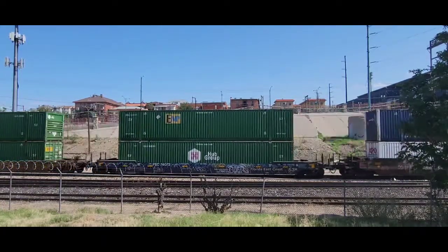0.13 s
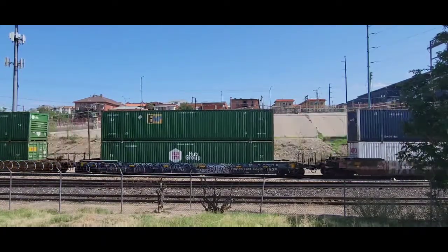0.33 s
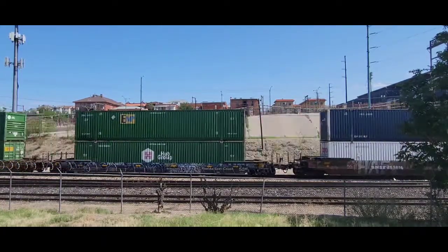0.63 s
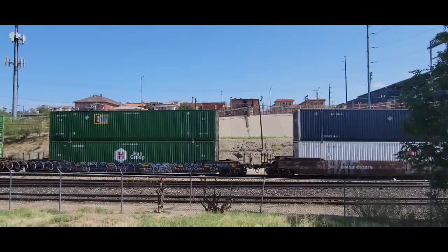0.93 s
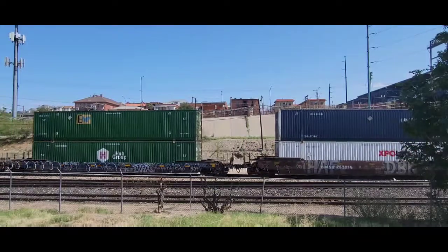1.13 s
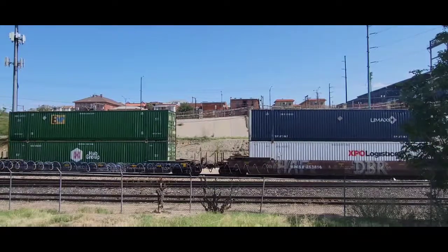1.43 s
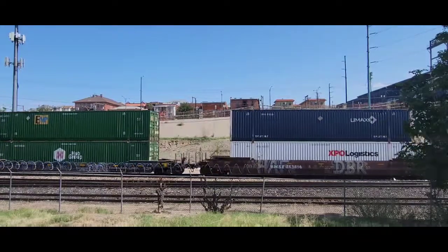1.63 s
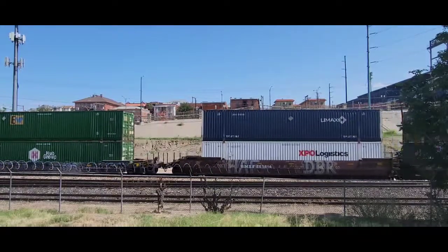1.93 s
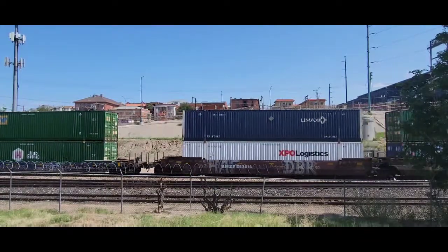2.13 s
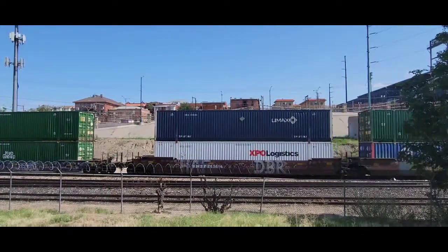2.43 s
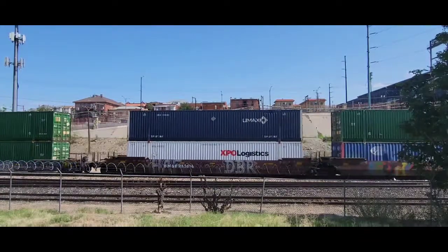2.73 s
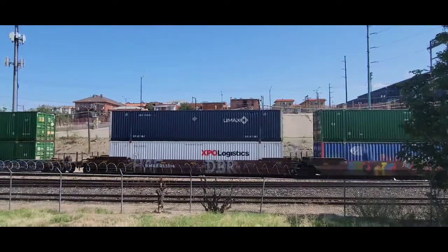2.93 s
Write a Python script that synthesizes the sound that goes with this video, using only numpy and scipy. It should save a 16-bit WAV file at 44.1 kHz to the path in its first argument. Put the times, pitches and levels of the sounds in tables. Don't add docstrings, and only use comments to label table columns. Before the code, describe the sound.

A slow freight train passes continuously outdoors, heard from trackside on a stereo phone. Rail rumble and dull, irregular hollow wagon booms run throughout. Wheel scrape, bright flange hiss and thin, wavering squeals start on the right, strongest at 0-1.3 s, cross the centre near 1.4 s and fade left, sagging slightly in pitch. Around 1.9-2.7 s another wheel chirps and hisses ahead; rumble swells near 2.85 s. A wall reflects faintly.

```python
import sys
import numpy as np
from scipy import signal
from scipy.fft import rfft, irfft, next_fast_len
from scipy.io import wavfile
from scipy.ndimage import uniform_filter1d, map_coordinates

SR = 44100
rng = np.random.default_rng(int(sys.argv[2]) if len(sys.argv) > 2 else 0)


def pcm_store(signal):
    levels = np.round(np.clip(np.atleast_2d(signal), -1, 1) * 32767)
    wavfile.write(sys.argv[1], SR, levels.astype(np.int16).T)


def undo_db(level):
    steps = np.asarray(level, float) / 20
    return 10 ** steps


N = 136710

SPEED_MS, DISTANCE_M, ABEAM_S = 6.5, 22, 1.4
SOUND_MS = 343
RIM_PURE = .7


def unit(x):
    return x / np.sqrt(np.mean(np.abs(x) ** 2) + 1e-20)


def along(points, hz):
    f, value = np.transpose(points)
    return np.interp(np.log(hz + 1), np.log(f + 1), value)


def curves(rows):
    s, *columns = np.transpose(rows)
    t = np.arange(N) / SR
    return [np.interp(t, s, column) for column in columns]


def wobble(rate, size=N):
    knots = rng.standard_normal(int(size * rate / SR) + 4)
    return map_coordinates(knots, [np.arange(size) * rate / SR])


def filtered(x, response):
    m = next_fast_len(N + 8192)
    hz = np.fft.rfftfreq(m, 1 / SR)
    return irfft(rfft(x, m) * response(hz), m)[..., :N]


def rush(spectrum, patchy_db, modal_db=0, channels=1):
    hz, _, z = signal.stft(rng.standard_normal((channels, N)), SR, nperseg=2048)
    patch, streak = rng.standard_normal((2, *z.shape[1:]))
    patch = uniform_filter1d(uniform_filter1d(patch, size=12, axis=0), size=3, axis=1)
    streak = uniform_filter1d(uniform_filter1d(streak, size=2, axis=0), size=9, axis=1)
    gain_db = patchy_db * unit(patch) + modal_db * unit(streak) + along(spectrum, hz)[:, None]
    return unit(signal.istft(z * undo_db(gain_db), nperseg=2048)[1][:, :N])


def gate(t, length):
    attack_s, release_s = .01, .015
    return np.clip(t / attack_s, 0, 1) * np.exp(-np.clip(t - length, 0, None) / release_s)


def reach(t):
    return np.hypot(DISTANCE_M, SPEED_MS * (ABEAM_S - t))


def singing(rows, width_hz, pure):
    slip_rad, flutter_db = .8, .8
    out = np.zeros(N + SR)
    for s, length, hz, db in rows:
        t = np.arange(round((length + .2) * SR)) / SR
        size = len(t)
        fuzz = unit(wobble(width_hz, size) + 1j * wobble(width_hz, size))
        slip = np.exp(1j * slip_rad * wobble(width_hz, size))
        swing = np.sqrt(pure) * slip + np.sqrt(1 - pure) * fuzz
        level = undo_db(db + 3 + flutter_db * wobble(12, size))
        carrier = np.exp(2j * np.pi * hz * (t - reach(s + t) / SOUND_MS))
        out[round(s * SR):][:size] += (swing * level * carrier).real * gate(t, length)
    return out[:N]


WALL_S, WALL_DB = (.011, .017), -8


def echoed(x):
    return undo_db(WALL_DB) * np.array([np.roll(x, round(s * SR)) for s in WALL_S])


# t/s, sine of angle (+ right)
BEARING = [
    (0, .36),
    (.78, .2),
    (.95, .07),
    (1.5, -.06),
    (1.85, -.21),
    (2.6, -.34),
    (3.1, -.5),
]


def ports(x):
    ports_m, side_db = .15, 5
    hz, t, z = signal.stft(x, SR, nperseg=512)
    side = hz[:, None] * np.interp(t, *np.transpose(BEARING))
    lag = np.exp(1j * np.pi * side * ports_m / SOUND_MS)
    turn = lag * undo_db(side_db * side / 30000)
    return signal.istft(np.array([z / turn, z * turn]), nperseg=512)[1][:, :N]


# f/Hz, level/dB per Hz
RAIL = [(125, -30), (195, -3), (250, -3), (400, -7), (800, -9), (1250, -11), (1700, -16), (3500, -50)]
# t/s, level/dB
RUMBLE = [
    (0, -28.5),
    (.9, -30),
    (1.9, -31),
    (2.6, -29.5),
    (2.85, -27.5),
    (3.1, -29),
]


def rails():
    right, left, *around = rush(RAIL, patchy_db=1.2, channels=4)
    lag = round(.00023 * SR)
    one_port = np.roll(right, lag) + np.roll(left, -lag)
    other_port = np.roll(right, -lag) + np.roll(left, lag)
    ends = unit(np.array([one_port, other_port]))
    return undo_db(curves(RUMBLE)[0] + .6 * wobble(3)) * (ends + .55 * np.array(around))


# t/s, level/dB, main panel f/Hz
BOOM = [(0, -23, 66), (.18, -21, 74), (.35, -27, 90), (.57, -24, 70), (.65, -20, 82), (1.0, -22, 68),
        (1.25, -20, 90), (1.45, -19, 70), (1.54, -26, 75), (1.8, -19, 74), (2.1, -20, 84), (2.6, -20, 80),
        (2.9, -19, 68), (3.1, -19, 82)]
# f/Hz, level/dB per Hz
BODY = [(12, -40), (22, -22), (33, -7), (60, -4), (82, 0), (115, -4), (160, -14), (260, -45)]
# t/s, length/s, f/Hz, level/dB
THRUM = [(.32, .3, 37, -28), (.72, .62, 37, -22), (1.4, .2, 40, -27), (1.65, .3, 36, -29),
         (2.3, .7, 45, -30), (0, .12, 42, -28), (.09, .09, 110, -24), (.14, .1, 73, -22),
         (.61, .07, 84, -21), (.77, .08, 74, -24), (.98, .08, 65, -23), (1.08, .07, 84, -24),
         (1.2, .1, 90, -19), (1.36, .14, 71, -19), (1.7, .08, 78, -23), (1.8, .1, 68, -20),
         (2.04, .09, 83, -20), (2.16, .08, 78, -24), (2.34, .08, 81, -25), (2.55, .13, 79, -19),
         (2.75, .1, 79, -19), (2.88, .08, 62, -23), (3.0, .1, 80, -23)]


def wagons():
    panel_level_db, side_level_db = -11, -19
    boom_db, panel_hz = curves(BOOM)
    mid, side = filtered(rng.standard_normal((2, N)), lambda hz: undo_db(along(BODY, hz)))
    phase = 2 * np.pi * np.cumsum(panel_hz + 6 * wobble(12)) / SR
    panel = np.sin(phase) * undo_db(panel_level_db + 3 + 2.5 * wobble(14))
    jolts = undo_db(-1.5) * singing(THRUM, width_hz=8, pure=.85)
    mid = undo_db(boom_db + .4) * (.74 * unit(mid) + panel) + jolts
    side = unit(side) * undo_db(boom_db + side_level_db)
    return np.array([mid + side, mid - side])


# t/s, length/s, f/Hz at rest, level/dB
AHEAD = [(1.88, .1, 9400, -24.5), (1.99, .075, 9395, -24), (2.19, .03, 9430, -28), (2.25, .21, 9420, -26.5),
         (2.47, .12, 9430, -29), (2.61, .035, 9445, -25.5), (2.66, .05, 9445, -31), (1.91, .2, 12625, -29),
         (2.48, .14, 12660, -31), (2.12, .19, 12790, -35), (2.57, .08, 13060, -33), (2.08, .14, 8090, -41)]
# t/s, length/s, level/dB
AHEAD_HISS = [
    (1.88, .18, -23),
    (2.47, .25, -25),
]
# f/Hz, level/dB per Hz
FLANGE = [(5000, -35), (7800, -12), (8600, -5.5), (9980, -8.5), (12700, 0), (14800, -5), (15450, -10),
          (15700, -120)]


def wheel_ahead():
    t = np.arange(N) / SR
    bursts = sum(undo_db(db) * gate(t - s, length) for s, length, db in AHEAD_HISS)
    hiss = bursts * rush(FLANGE, patchy_db=1.5, modal_db=1.5)
    song = singing(AHEAD, width_hz=110, pure=RIM_PURE)
    return hiss + song + echoed(song)


# t/s, tread scrape level/dB, flange hiss level/dB
SCRAPE = [(0, -24, -21), (.15, -24, -19), (.4, -25, -19), (.7, -26, -20), (.93, -27, -24), (1.2, -26, -23),
          (1.35, -24, -22), (1.55, -30, -24.5), (1.68, -28, -21), (1.85, -28, -21.5), (2.1, -28, -24),
          (2.4, -27, -21), (2.8, -27, -24), (3.1, -26.5, -24)]
# f/Hz, level/dB per Hz
TREAD = [(800, -40), (1300, -16), (2000, -7), (3000, -2.5), (3660, -3), (4500, -3), (5800, -4), (9000, -11),
         (12000, -40)]
WHEEL_HZ = [2000, 2490, 3050, 3960, 4610, 5100, 6100, 7200, 8350]
# t/s, length/s, f/Hz at rest, level/dB
WEB = [(.06, .22, 1998, -37), (1.04, .5, 1998, -41), (1.99, .55, 1998, -38), (.03, .12, 2490, -32),
       (.25, .26, 2490, -36), (1.13, .2, 2485, -36), (2.31, .1, 2485, -38), (.69, .45, 2955, -38),
       (2.09, .5, 2955, -36), (0, .37, 3050, -29), (1.3, .3, 3185, -36), (1.99, .44, 3185, -37),
       (0, .58, 3960, -30), (.63, .6, 3960, -37), (1.28, .2, 3960, -31), (1.5, .4, 3960, -41),
       (2.03, .4, 3960, -37), (2.66, .12, 3960, -35), (.84, .28, 4607, -36), (1.15, .16, 4607, -34),
       (3.0, .1, 4607, -38), (.41, .3, 5010, -33), (1.17, .33, 5010, -37), (2.24, .53, 5005, -37),
       (.76, .7, 5305, -38), (2.0, .47, 6030, -40), (.58, .17, 7280, -36), (1.88, .4, 7290, -38),
       (0, .19, 1158, -41), (.8, .1, 5305, -33)]
# t/s, length/s, f/Hz at rest, level/dB
RIM = [(.09, .15, 8360, -25.5), (.43, .18, 8350, -26), (.675, .05, 8345, -22), (.75, .07, 8345, -25),
       (.83, .17, 8350, -20), (1.0, .16, 8345, -25), (.75, .41, 8275, -30), (1.32, .08, 9140, -34),
       (1.13, .06, 9400, -32), (1.3, .22, 8345, -29.5), (1.82, .3, 8330, -35), (2.5, .16, 8350, -35),
       (.09, .3, 9420, -33), (.42, .16, 9420, -36), (.98, .36, 9405, -38), (.37, .55, 10370, -36),
       (.03, .6, 11510, -31), (.75, .33, 11450, -35), (.24, .16, 11720, -33), (.15, .9, 12060, -27),
       (1.18, .34, 12050, -34), (.11, .24, 12470, -29), (.89, .6, 12490, -34), (.27, .24, 12840, -26),
       (1.13, .28, 12860, -35), (.1, .18, 13160, -23), (.4, .7, 13130, -30), (1.25, .54, 13150, -35),
       (.29, .22, 13835, -30), (.57, .37, 13860, -32), (1.05, .4, 13850, -31), (1.84, .2, 13930, -32),
       (1.57, .22, 14395, -35), (1.02, .22, 14680, -36), (1.9, .1, 12020, -32), (1.59, .11, 11730, -35)]


def wheel_modes(hz):
    width_hz, between_db = 240, -5
    peaks = sum(1 / (1 + (2 * (hz - centre) / width_hz) ** 4) for centre in WHEEL_HZ)
    return np.sqrt(undo_db(2 * between_db) + peaks)


def bogie():
    tread_db, flange_db = curves(SCRAPE)
    shake_db = .6 * wobble(8) + .7 * wobble(18)
    tread = unit(filtered(rush(TREAD, patchy_db=1.5, modal_db=3.2, channels=3), wheel_modes))
    tread = tread * undo_db(tread_db + shake_db + .6)
    flange = rush(FLANGE, patchy_db=.8, modal_db=2.4, channels=3)
    flange = flange * undo_db(flange_db + .6 * shake_db - 1.1)
    web = undo_db(.6) * singing(WEB, width_hz=90, pure=.3)
    rim = undo_db(1.1) * singing(RIM, width_hz=80, pure=RIM_PURE)
    song = web + rim
    scatter = undo_db(-.6) * tread[1:] + undo_db(1) * flange[1:]
    return ports(tread[0] + flange[0] + song) + echoed(song) + scatter


def scene():
    return rails() + wagons() + wheel_ahead() + bogie()


# f/Hz, left over right level/dB
SHADE = [(300, -.8), (2400, .3), (8500, 3.5), (10500, 0), (13000, -4.5)]


def port_colour(x):
    return filtered(x, lambda hz: undo_db(along(SHADE, hz) * [[.5], [-.5]]))


def roll_off(x):
    return signal.sosfilt(signal.butter(12, 16120, fs=SR, output="sos"), x)


def record(dry):
    clip_top, top_hz = 1.1, 15520
    x = port_colour(dry)
    x = x / (1 + np.abs(x / clip_top) ** 8) ** (1 / 8)
    mix = filtered(x, lambda hz: hz < top_hz)
    return roll_off(mix)


dry = scene()
out = record(dry)
pcm_store(out)
```